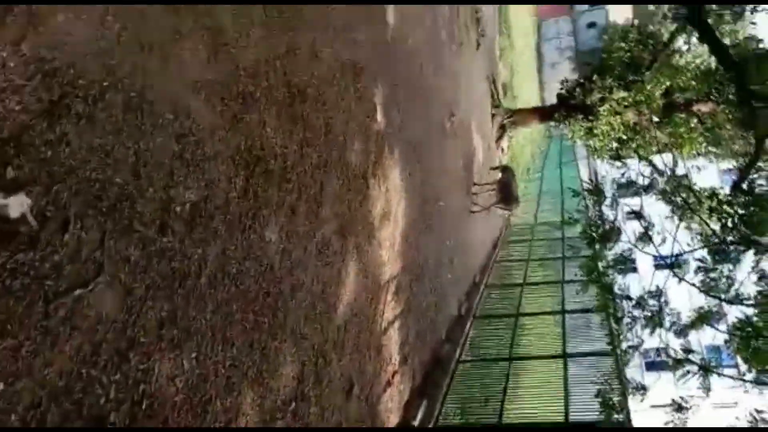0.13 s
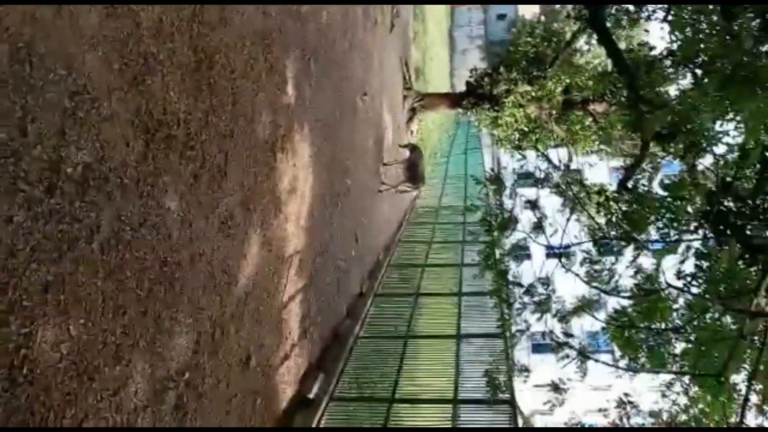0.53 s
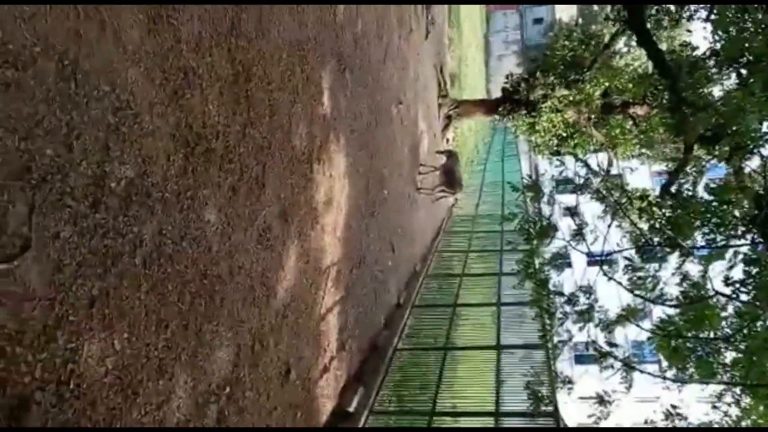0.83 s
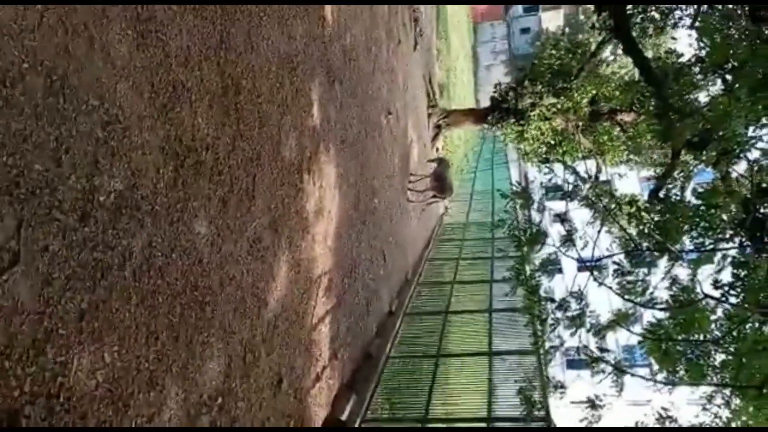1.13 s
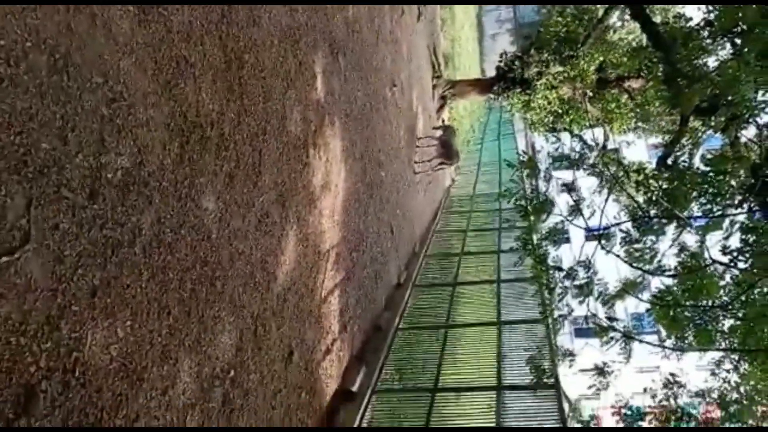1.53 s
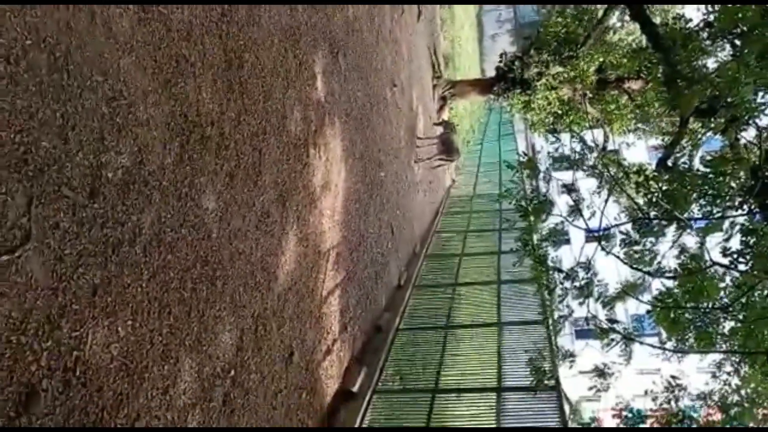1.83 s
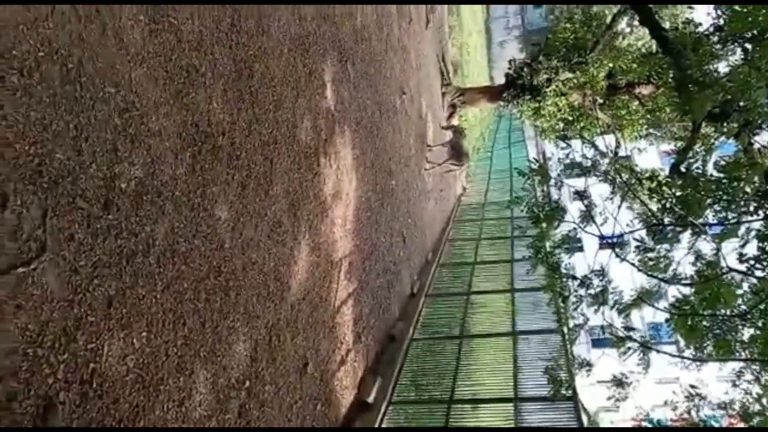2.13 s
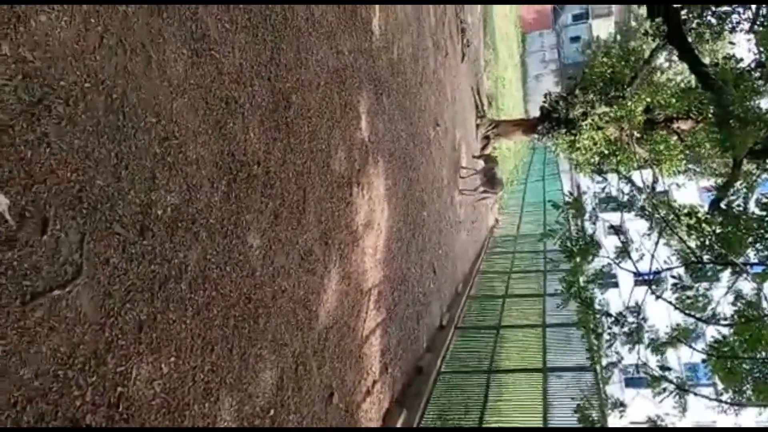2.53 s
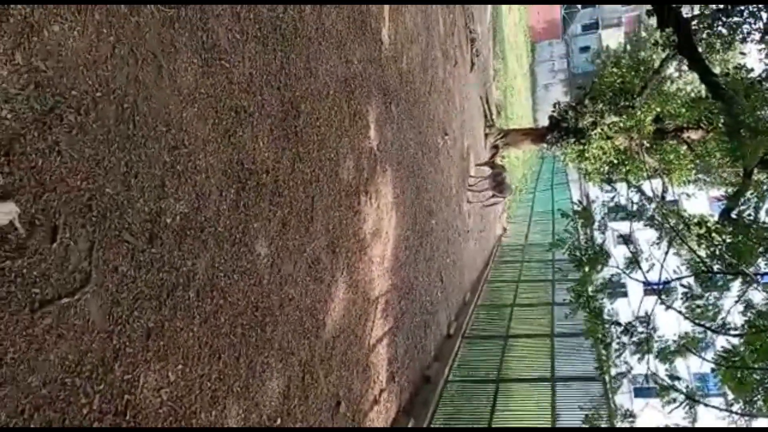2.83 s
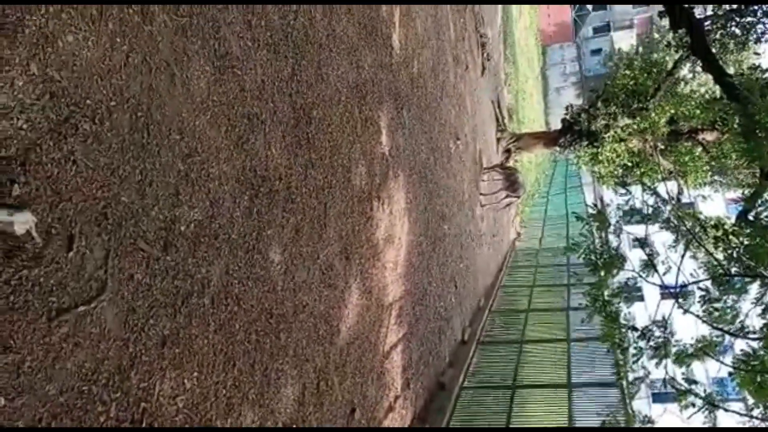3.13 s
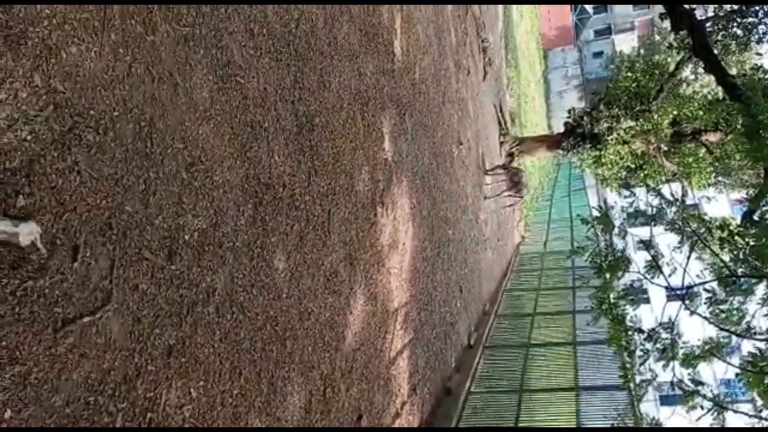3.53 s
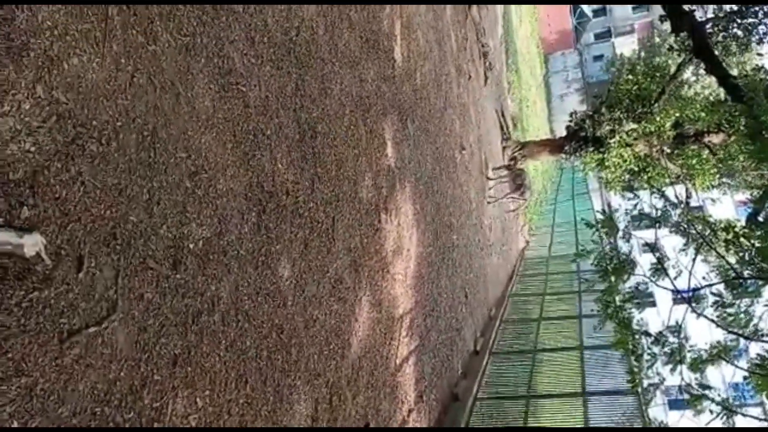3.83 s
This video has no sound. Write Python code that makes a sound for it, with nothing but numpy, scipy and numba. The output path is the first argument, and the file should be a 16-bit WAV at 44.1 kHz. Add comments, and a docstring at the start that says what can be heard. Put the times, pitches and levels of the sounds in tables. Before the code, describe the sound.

A donkey brays loudly and harshly, alternating rough blaring haws with rasping, wheezing in-breaths outdoors.

```python
"""In a dirt yard a donkey brays: a long held note that thins into a squeal, a short grunt, then harsh out-strokes
("haw") that alternate with rasping in-strokes ("hee"), the last two breaking into a shrill whistle.
Fold pulses and puffs of air ring the throat; rasp and hiss are filtered noise; squeals are sums of partials.
Ground and fence reflect the sound, which reaches the left microphone first, over faint outdoor air."""
import sys
import numpy as np
from scipy import signal
from scipy.fft import rfft, irfft
from scipy.io import wavfile
from scipy.ndimage import uniform_filter1d, map_coordinates
from numba import njit

SR = 44100
rng = np.random.default_rng(int(sys.argv[2]) if len(sys.argv) > 2 else 0)


def to_wav(s):
    """Save 16-bit WAV."""
    ch = np.atleast_2d(s).T  # columns
    pcm = np.round(np.clip(ch, -1, 1) * 32767)  # PCM
    wavfile.write(sys.argv[1], SR, pcm.astype(np.int16))


N = 176400  # samples

# The long out-stroke. Each row: time in seconds, mean pitch in Hz, level in dB,
# roughness (held to 0-1), strong-weak alternation of the pulses (0-1).
HELD_NOTE = [(0, 700, -24, 1.11, 0), (.035, 688, -27.5, 0.77, 0.9), (.055, 686.6, -24, 0.33, 1),
             (.12, 685.4, -25.5, 0.32, 0.8), (.18, 683, -33.5, 0.14, 0), (.22, 659.2, -30.5, 0.6, 1),
             (.34, 631.4, -38, 0.39, 0.2), (.42, 679, -28, 0.53, 0.99), (.48, 686.7, -33, 0.33, 0.1),
             (.565, 647, -31.5, 0.41, 0.54), (.615, 638, -45, 1.2, 0.7)]
# Thin squeals, two over and after the held note and one over the grunt.
# Each row: time in seconds, mean pitch in Hz, level in dB before the partial levels.
SQUEALS = [
    [(.25, 1076, -47), (.32, 1064, -39.5), (.39, 1050, -39)],
    [(.55, 1084, -39), (.61, 1102, -43.5), (.68, 1040, -45.5), (.77, 1040, -55), (.815, 719, -52.5)],
    [(1.032, 1140, -44), (1.09, 1099, -35.5), (1.14, 1165, -48)],
]


def brays():
    """Out-strokes as source and filter: each has its own pitch course, airy treble and mouth resonance."""
    # Each row: time in seconds, mean pitch in Hz, level in dB, roughness (0-1), pulse alternation (0-1).
    grunt_rows = [(1.03, 545.3, -41.5, 0.16, 0.059), (1.065, 636, -33.5, 0.37, 0.25),
                  (1.11, 655.6, -33.5, 0.41, 0.8), (1.155, 645, -49, 0.68, 0.37)]
    first_haw = [(2.161, 894.2, -39, 0.89, 1), (2.18, 824.6, -23.5, 0.41, 0.94),
                 (2.23, 820.6, -23, 0.35, 1), (2.234, 694, -26, 0.93, 0.9), (2.31, 692.3, -29, 0.52, 0.65),
                 (2.38, 650.4, -35.5, 0.21, 0.32), (2.385, 555, -36, 0.18, 0.081),
                 (2.415, 557, -42, 0.31, 0.081)]
    second_haw = [(3.092, 500.2, -34, 0.75, 0.054), (3.106, 448.4, -25, 0.84, 0.027),
                  (3.135, 272.8, -24, 0.27, 0), (3.17, 284, -22.5, 0.55, 0),
                  (3.188, 320.5, -22.5, 0.3, 0.26), (3.32, 322.8, -26, 0.31, 0.66),
                  (3.42, 350.2, -40, 0.76, 0.69)]
    out = haw(HELD_NOTE, low_cut_hz=426, treble_air=0.46, buzz_hz=1825, mouth_db=-6.5)
    out = out + haw(grunt_rows, low_cut_hz=320, treble_air=0.63, buzz_hz=1740, mouth_db=-10)
    out = out + haw(first_haw, low_cut_hz=336, treble_air=0.61, buzz_hz=2130, mouth_db=-4)
    return out + haw(second_haw, low_cut_hz=157, treble_air=1.4, buzz_hz=3720, mouth_db=3.5)


def haw(rows, low_cut_hz, treble_air, buzz_hz, mouth_db, rattle_db=2.5, rattle_hz=170, wobble=.022):
    """Modulated source and filter: folds slip between clear, doubled and rough; tissue rattles, the mouth rings."""
    # Throat response. Each row: frequency in Hz, gain in dB.
    throat_curve = [(170, -35.5), (275, -9.5), (340, -21), (440, -8.5), (620, -9), (820, 0), (1000, 5.5),
                    (1350, -1.5), (1650, -7), (1950, -5), (2800, -17.5), (4200, -22), (5200, -24.5),
                    (7600, -37), (8700, -31), (12000, -37.5), (15000, -57)]
    mouth_hz, mouth_width_hz = 1379, 79
    gate, hz, db, rough, half = follow(rows)
    rough = np.clip(rough, 0, 1)
    hz = hz * (1 + .008 * walk(45) + wobble * rough * walk(200))
    sound = voice(hz, rough, np.clip(half, 0, 1), throat_curve, treble_air=treble_air, buzz_hz=buzz_hz)
    # the rattle is an amplitude modulation at a wandering rate
    rattle_phase = 2 * np.pi * np.cumsum(rattle_hz * (1 + .35 * walk(120))) / SR
    sound = sound * undb(rattle_db * np.sqrt(rough) * np.sin(rattle_phase))
    mouth = ring(sound, mouth_hz * (1 + 0.012 * walk(26)), float(mouth_width_hz))
    sound = scatter(sound + undb(mouth_db) * mouth)
    sound = signal.sosfilt(signal.butter(3, low_cut_hz, "high", fs=SR, output="sos"), sound)
    return gate * undb(db) * steady(sound)


def voice(hz, rough, half, throat, jitter=0.044, shimmer=0.5, breath=0.84, treble_air=.7, buzz_hz=2700,
          puff_s=0.0019):
    """Source and filter: fold pulses, each with a decaying puff of air, ring the throat; treble is mostly air."""
    pulses = folds(hz, jitter * rough, shimmer * rough, half, rng.standard_normal((N // 20, 2)))
    puff_envelope = signal.lfilter([1], [1, -np.exp(-1 / (puff_s * SR))], pulses)
    puffs = steady(noise() * puff_envelope)
    high_puffs = signal.sosfilt(signal.butter(4, buzz_hz, "high", fs=SR, output="sos"), puffs)
    buzz = steady(pulses - uniform_filter1d(pulses, SR // 100))  # less its mean over 10 ms
    source = lowpass(buzz, buzz_hz) + breath * rough * puffs + treble_air * high_puffs
    return steady(colour(source, throat))


@njit
def folds(hz, jitter, shimmer, half, chance):
    """Relaxation oscillation: one pulse per closure of the vocal folds, each with its own period and size."""
    out, phase, k = np.zeros(len(hz) + 1), 0., 0
    for i in range(len(hz)):
        step = hz[i] * np.exp(jitter[i] * chance[k, 0]) / SR
        phase += step
        if phase >= 1:
            phase, k = phase - 1, k + 1
            size = np.exp(shimmer[i] * chance[k, 1]) * (1 + half[i] * (1 - 2 * (k % 2)))
            # share the pulse between two samples to place it between them
            out[i] += size * phase / step
            out[i + 1] += size * (1 - phase / step)
    return out[:-1]


def scatter(x):
    """All-pass dispersion: each pulse spreads over a few milliseconds."""
    delay_s, feedback = .0017, 0.46
    a = np.r_[1, np.zeros(int(delay_s * SR)), feedback]
    return signal.lfilter(a[::-1], a, x)


def hees(rasp_db=1.5, hiss_rasp_db=2, drift=0.074, hollow_width_hz=330):
    """Turbulence in resonators: air flutters in the throat, hisses at the nostrils and wheezes in an arch."""
    # In-strokes. Each row: time in seconds, level of the rasp in dB, level of the hiss in dB.
    strokes = [
        [(1.314, -52, -52), (1.36, -34.5, -58), (1.62, -35.5, -52), (1.67, -46.5, -54.5), (1.77, -49.5, -52),
         (1.83, -38.5, -56.5), (2.01, -34, -63.5), (2.07, -50.5, -86)],
        [(2.516, -57.5, -58.5), (2.58, -34, -58.5), (2.72, -40.5, -49.5), (2.92, -34.5, -58.5),
         (2.99, -37, -69), (3.03, -54, -77)],
        [(3.518, -44.5, -60), (3.62, -34.5, -61), (3.73, -40, -53.5), (3.92, -35.5, -62), (3.97, -58, -75)],
    ]
    # Breathy wheezes of the last two. Each row: time in seconds, centre in Hz, level in dB of the lower resonance.
    wheeze_rows = [
        [(2.57, 511, -47), (2.65, 693, -38.5), (2.75, 725, -37), (2.9, 544, -49)],
        [(3.57, 540, -45), (3.72, 737, -41), (3.89, 576, -51.5)],
    ]
    # Response of the throat, then of the nostrils. Each row: frequency in Hz, gain in dB.
    throat_curve = [(200, -42), (275, -9), (340, -24.5), (450, -2), (650, 2.5), (1000, 8), (1400, -3.5),
                    (1700, -7), (2100, -4.5), (2650, -17), (3600, -18), (5200, -21.5), (7000, -54),
                    (9000, -24.5), (14500, -53.5)]
    nostril_curve = [(5500, 4.5), (7400, -5.5), (8400, 9.5), (9700, 6), (11800, -3), (15000, -20)]
    # Wandering resonances of the narrowed throat. Each row: mean centre in Hz, width in Hz, added level in dB.
    throat_rings = [(290, 12, 0.5), (1083, 102, 2), (2160, 72, 0.5)]
    # a second resonance and a hollow move with the wheeze, at fixed multiples of its centre
    wheeze_width_hz, upper_ratio, upper_db, hollow_ratio = 55, 1.75, -5, 1.27

    rasp = colour(noise() * undb(rasp_db * walk(260)), throat_curve)
    rings = sum(undb(db) * ring(rasp, hz * (1 + drift * walk(17)), float(width))
                for hz, width, db in throat_rings)
    rasp = steady(rasp + rings)
    wheeze = 0
    for gate, hz, db in map(follow, wheeze_rows):
        # the hollow deepens as the wheeze grows
        rasp = rasp - gate * undb(db - db.max()) * ring(rasp, hollow_ratio * hz, float(hollow_width_hz))
        upper = undb(upper_db) * airy(upper_ratio * hz, 2 * wheeze_width_hz)
        wheeze = wheeze + gate * undb(db) * (airy(hz, wheeze_width_hz) + upper)
    hiss = steady(colour(noise() * undb(hiss_rasp_db * walk(260)), nostril_curve))
    return wheeze + sum(gate * (undb(db) * rasp + undb(hiss_db) * hiss)
                        for gate, db, hiss_db in map(follow, strokes))


def creaks(rough=0.298):
    """Source and filter on the in-breath: the folds catch on the incoming air and buzz at a falling pitch."""
    # Voiced starts of the in-strokes. Each row: time in seconds, mean pitch in Hz, level in dB.
    creak_rows = [
        [(1.314, 540, -39.5), (1.348, 509, -32), (1.38, 406, -41.5)],
        [(2.516, 490, -38), (2.56, 442.4, -35)],
        [(3.518, 446.5, -41), (3.56, 419.3, -36.5)],
    ]
    # Throat response. Each row: frequency in Hz, gain in dB.
    throat_curve = [(300, -25), (1000, -1), (2100, -5.5), (2700, -14), (4400, -11.5), (9000, -57)]
    out = 0
    for gate, hz, db in map(follow, creak_rows):
        buzz = voice(hz, np.full(N, rough), np.zeros(N), throat_curve, buzz_hz=4200, treble_air=0.71)
        out = out + gate * undb(db) * buzz
    return out


def whistles(waver=0.0087, flutter_db=3.0, under_db=(-7, -3.5), under_width_hz=100, arch=0.0091,
             chop_hz=620, chop_db=5, jet_hz=3400, jet_width_hz=1900, jet_db=-14):
    """Jet tone with a breathy subharmonic: the octave below rises with level, and folds chop a bright band above."""
    # Each row: time in seconds, mean pitch in Hz, level in dB that scales the note, its octave and the jet,
    # level of the shrill band in dB.
    whistle_rows = [
        [(2.61, 4530, -55, -54), (2.632, 4386, -33.5, -40.5), (2.734, 4448, -33.5, -38),
         (2.752, 4470, -33, -31.5), (2.81, 4436, -36.5, -41), (2.835, 4630, -74, -56)],
        [(3.595, 4500, -47, -53.5), (3.63, 4426, -32, -38.5), (3.76, 4460, -35.5, -39),
         (3.812, 4425, -37, -39.5), (3.85, 4640, -60, -51)],
    ]
    # Response of the shrill band. Each row: frequency in Hz, gain in dB.
    shrill_curve = [(5500, -39), (6800, -11), (7600, -29), (8250, 5), (8880, 4.5), (9400, -5), (9850, 3),
                    (10700, -51), (15000, -52)]
    out = 0
    for rows, low_db in zip(whistle_rows, under_db):
        gate, hz, db, shrill_db = follow(rows)
        phase = 2 * np.pi * np.cumsum(hz * (1 + waver * walk(350))) / SR
        under = airy(hz / 2 * np.exp(arch * (db - db.max() + 2)), under_width_hz)
        jet = airy(np.full(N, float(jet_hz)), jet_width_hz)
        note = undb(flutter_db * walk(160)) * np.sin(phase) + undb(low_db) * under + undb(jet_db) * jet
        chop_phase = 2 * np.pi * np.cumsum(chop_hz * (1 + .15 * walk(300))) / SR
        chop = undb(chop_db * np.sin(chop_phase) + 2.5 * walk(200))
        shrill = steady(colour(noise() * chop, shrill_curve))
        out = out + gate * (undb(db) * note + undb(shrill_db) * shrill)
    return out


def squeals():
    """Harmonic series of tightened folds: thin squeals, and a higher note over the end of the held note."""
    # The higher note. Each row: time in seconds, mean pitch in Hz, level in dB before the partial levels.
    overtone_rows = [(.55, 2027, -53), (.625, 1873, -42.5), (.665, 2077, -52), (.755, 2110, -64.5),
                     (.78, 1900, -57.5), (.8, 1490, -57)]
    out = sum(tone(rows, partials_db=[3.0, -17, -28, -42, -26, -30], waver=0.0085) for rows in SQUEALS)
    return out + tone(overtone_rows, partials_db=[5.0, -36, -21, -24.5], waver=0.0073)


def falling_hum():
    """Harmonic series on a gliding fundamental: a falling hum within the first in-stroke."""
    # Each row: time in seconds, mean pitch in Hz, level in dB before the partial levels.
    hum_rows = [(1.64, 614.3, -43.5), (1.785, 591.7, -46), (1.795, 522, -44), (1.92, 478.3, -45.5),
                (2.0, 423, -50)]
    return tone(hum_rows, partials_db=[0, -6, -14, -16], waver=0.01)


def tone(rows, partials_db, waver):
    """Additive synthesis: harmonics locked to one wavering phase give a nearly pure note of the tightened folds."""
    gate, hz, db = follow(rows)
    phase = 2 * np.pi * np.cumsum(hz * (1 + waver * walk(250))) / SR
    partials = sum(undb(level) * np.sin((k + 1) * phase) for k, level in enumerate(partials_db))
    return gate * undb(db + walk(90)) * np.sqrt(2) * partials


def sidebands(sum_db=-7, difference_db=-11, width_hz=45):
    """Intermodulation: the first squeal beats with the held note and adds two rough combination tones."""
    gate, hz, db = follow(SQUEALS[0])
    held_hz = follow(HELD_NOTE)[1]
    sum_tone = undb(sum_db) * airy(hz + held_hz, width_hz)
    difference_tone = undb(difference_db) * airy(2 * hz - held_hz, width_hz)
    return gate * undb(db) * (sum_tone + difference_tone)


def airy(hz, width):
    """Resonant turbulence: noise blown through two equal resonances in series."""
    return steady(ring(ring(noise(), hz, float(width)), hz, float(width)))


@njit
def ring(x, hz, width):
    """Second-order resonance whose centre may move; gain 1 at the centre."""
    y, band, low = np.empty(len(x)), 0., 0.
    for i in range(len(x)):
        g, damping = np.tan(np.pi * hz[i] / SR), width / hz[i]
        v = (band + g * (x[i] - low)) / (1 + g * (g + damping))
        band, low, y[i] = 2 * v - band, low + 2 * g * v, damping * v
    return y


def follow(rows):
    """Piecewise-linear control: a gate that is open over the rows' span, then each column over time."""
    edge_s = 0.00133  # the gate closes over twice this, after the last row
    t, rows = np.arange(N) / SR, np.array(rows, float)
    opening = np.clip((t - rows[0, 0]) / edge_s, 0, 1)
    closing = np.clip((rows[-1, 0] - t) / (2 * edge_s) + 1, 0, 1)
    return [opening * closing] + [np.interp(t, rows[:, 0], column) for column in rows.T[1:]]


def undb(db):
    """Logarithmic level: decibels to amplitude gain."""
    return 10 ** (np.asarray(db) / 20)


def noise():
    """White noise: equal mean power at every frequency."""
    return rng.standard_normal(N)


def walk(rate):
    """Smoothed random modulation, with a spread near 1 and about rate new values a second."""
    k = max(int(SR / rate), 1)
    steps = np.repeat(rng.standard_normal(N // k + 1), k)
    return 1.3 * uniform_filter1d(uniform_filter1d(steps, k), k)[:N]


def colour(x, points):
    """Minimum-phase filtering: a causal response through the given (Hz, dB) points, by folding the cepstrum."""
    size = 2048
    hz, db = np.array(points, float).T
    bins_hz = np.arange(size // 2 + 1) * SR / size
    cepstrum = irfft(np.log(undb(np.interp(np.log(bins_hz + 1), np.log(hz), db))))
    cepstrum[1:size // 2] *= 2
    cepstrum[size // 2 + 1:] = 0
    return signal.oaconvolve(x, irfft(np.exp(rfft(cepstrum))))[:N]


def lowpass(x, hz):
    """Fourth-order Butterworth low-pass: maximally flat below the corner."""
    return signal.sosfilt(signal.butter(4, min(hz, SR / 2 - 1), fs=SR, output="sos"), x)


def steady(x):
    """Level normalisation: hold the rms over 40 ms near 1."""
    return x / np.sqrt(np.abs(uniform_filter1d(x * x, SR // 25)) + 1e-12)


def yard(x):
    """Reverberation by convolution: near reflections from ground and fence, and a faint dull tail from the houses."""
    near_db, near_s = 5, 0.019  # level, and time for the amplitude to fall to 1/e
    tail_db, tail_t60_s = -16.5, 0.35  # level, and time to fall by 60 dB
    t = np.arange(SR) / SR
    near = np.diff(rng.standard_normal(SR + 1))  # the treble scatters most
    near = near * np.exp(-t / near_s) * (t > .001)
    tail = lowpass(rng.standard_normal(SR), 7300) * undb(-60 * t / tail_t60_s) * (t > .02)
    response = undb(near_db) * near / np.linalg.norm(near) + undb(tail_db) * tail / np.linalg.norm(tail)
    return signal.oaconvolve(x, response)[:N]


def microphones(donkey):
    """Interaural-style differences: the direct sound comes later at the right, and the left is brighter."""
    # The pair turns slowly. Each row: time in seconds, lag of the right microphone in seconds.
    lag_rows = [(0, 0.00059), (1, 0.00054), (4, 0.00048)]
    # Balance of the pair. Each row: frequency in Hz, left over right in dB.
    balance = [(700, 0), (14500, 3.5)]
    t = np.arange(N) / SR
    lag = np.interp(t, *np.array(lag_rows).T)
    late = map_coordinates(donkey, [(t - lag) * SR], order=3)
    # each side takes half of the balance and its own reflections
    left = colour(donkey + yard(donkey), [(hz, db / 2) for hz, db in balance])
    right = colour(late + yard(donkey), [(hz, -db / 2) for hz, db in balance])
    return np.array([left, right])


def background(rumble_hz=100):
    """Diffuse and coherent noise: faint outdoor air, separate in each channel, over a low distant rumble in both."""
    # Spectrum of the air. Each row: frequency in Hz, gain in dB.
    air_curve = [(15, -23), (25, -5), (109, -17.5), (363, -32), (1090, -21.5), (3340, -38), (14900, -36.5)]
    air_db, rumble_db = -61.5, -65.5
    air = np.array([colour(noise(), air_curve) for _ in range(2)])
    rumble = lowpass(noise(), rumble_hz)
    return undb(air_db) * air / air.std() + undb(rumble_db) * rumble / rumble.std()


def scene():
    """Superposition: the donkey's sounds add, reach two spaced microphones and join the background."""
    donkey = brays() + hees() + whistles() + creaks()
    donkey = donkey + squeals() + sidebands() + falling_hum()
    return microphones(donkey) + background()


def record(dry):
    """Band limiting: a steep elliptic low-pass cuts the top."""
    top_hz = 15100
    return signal.sosfilt(signal.ellip(10, .2, 80, top_hz, fs=SR, output="sos"), dry)


dry = scene()
out = record(dry)
to_wav(out)
```